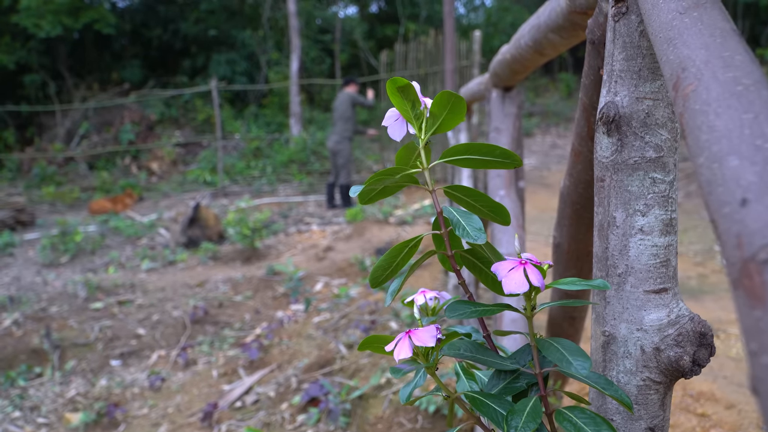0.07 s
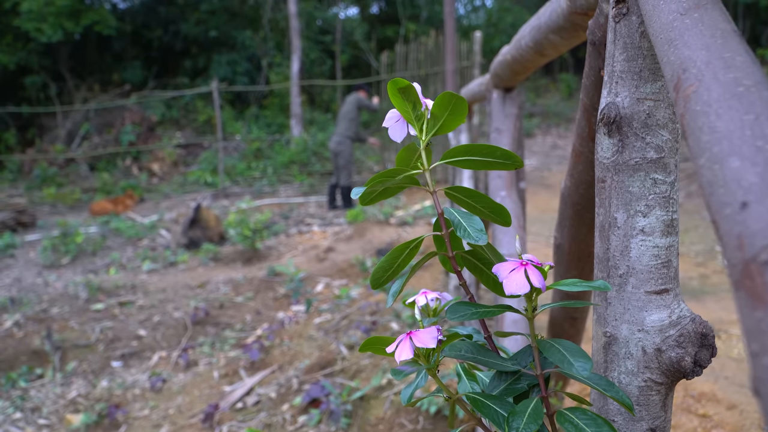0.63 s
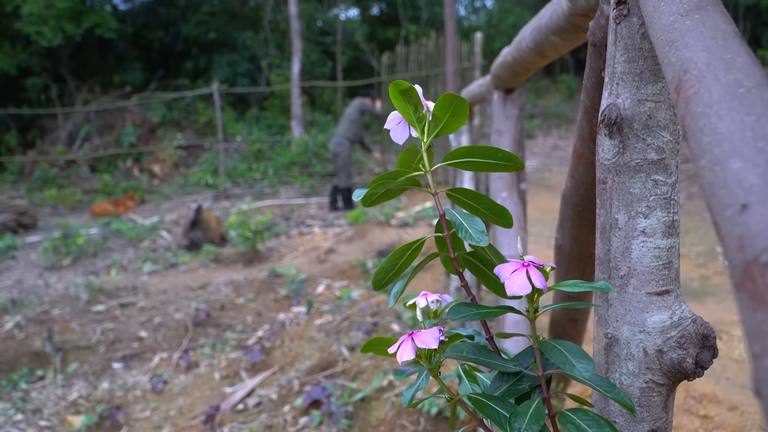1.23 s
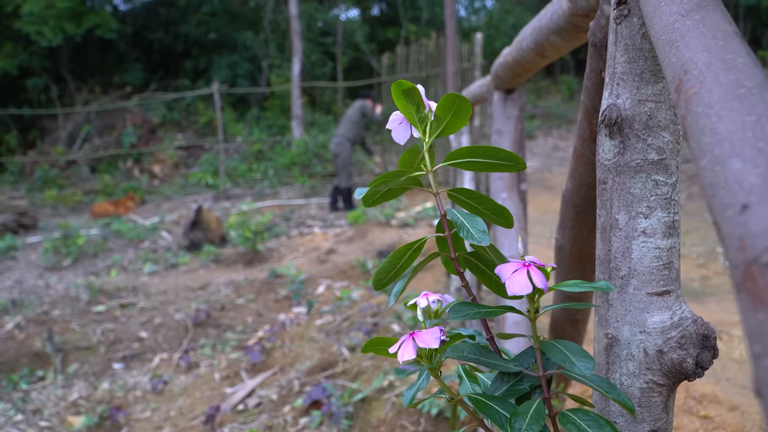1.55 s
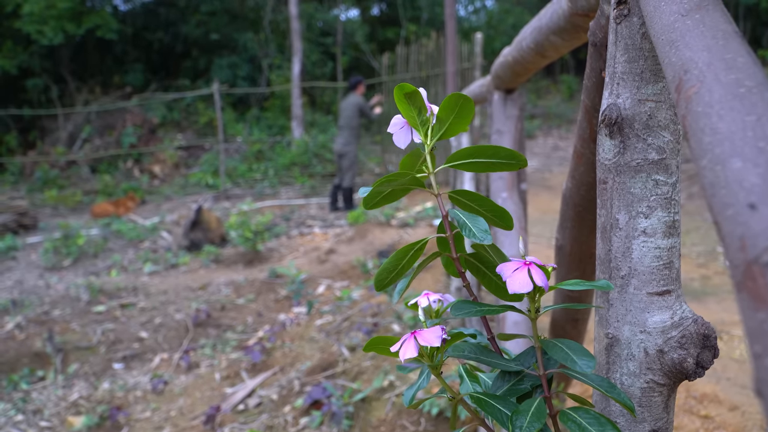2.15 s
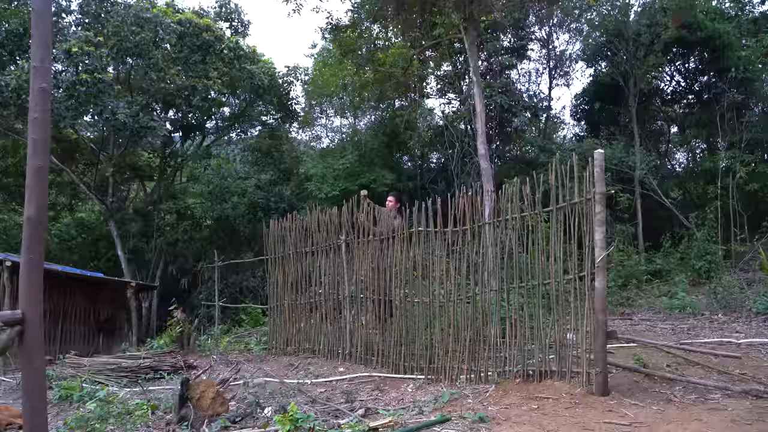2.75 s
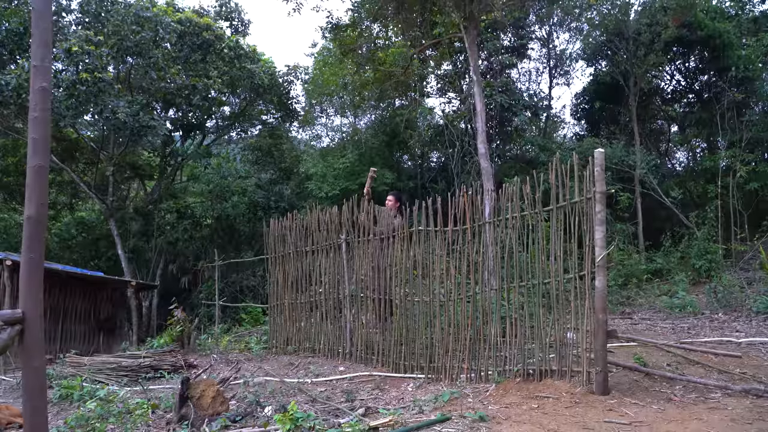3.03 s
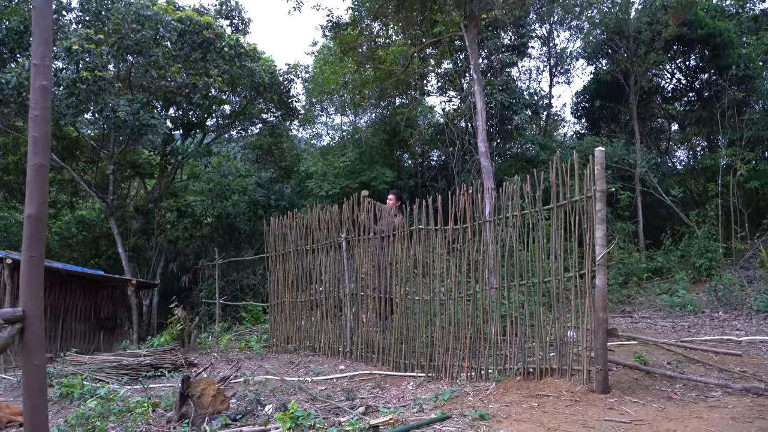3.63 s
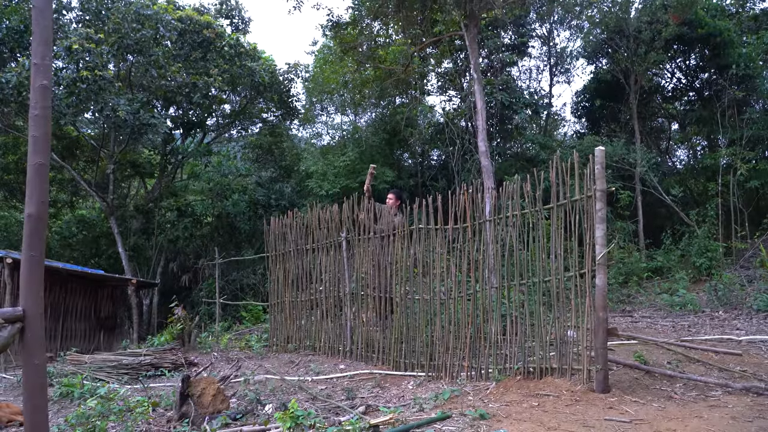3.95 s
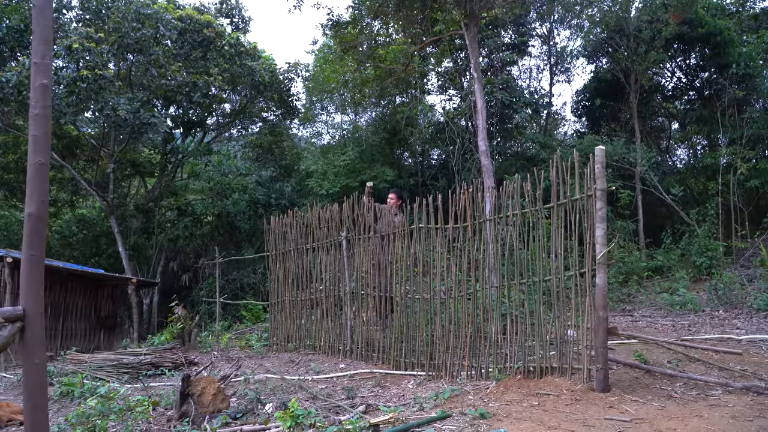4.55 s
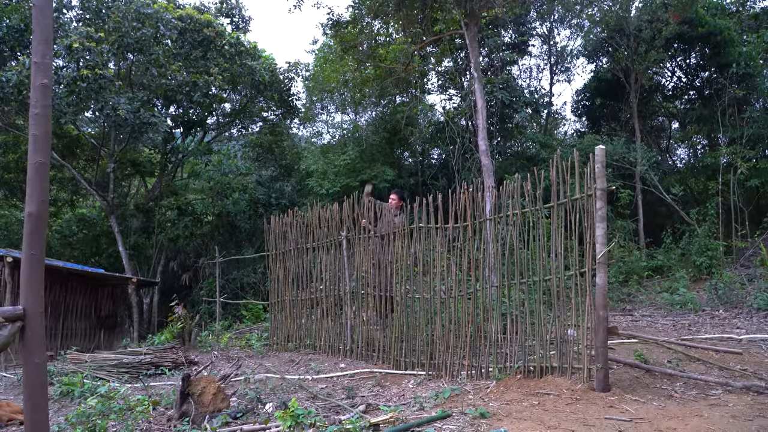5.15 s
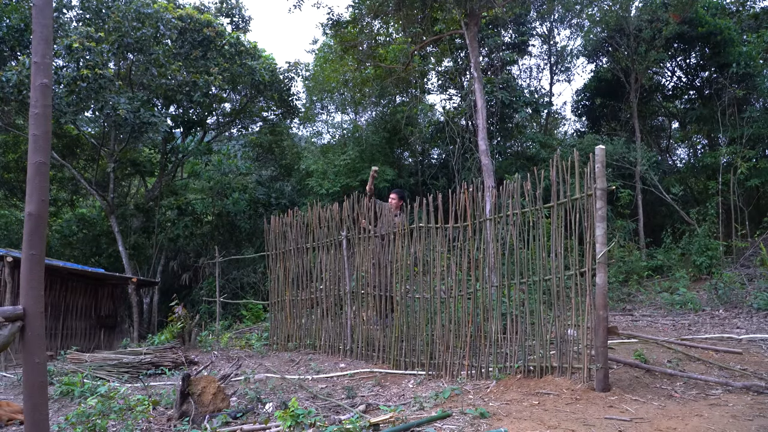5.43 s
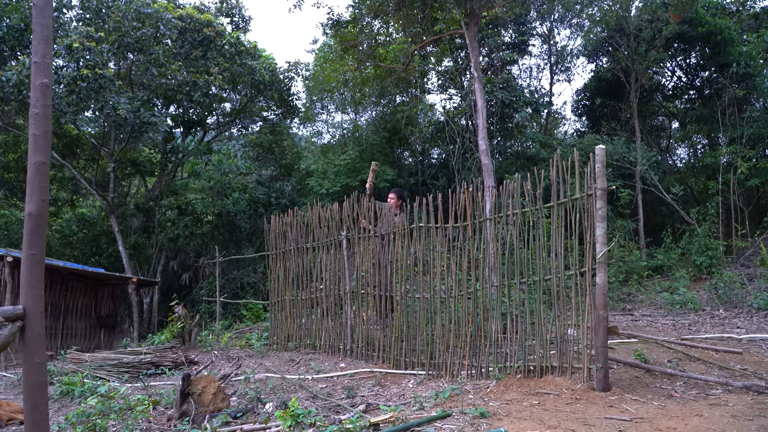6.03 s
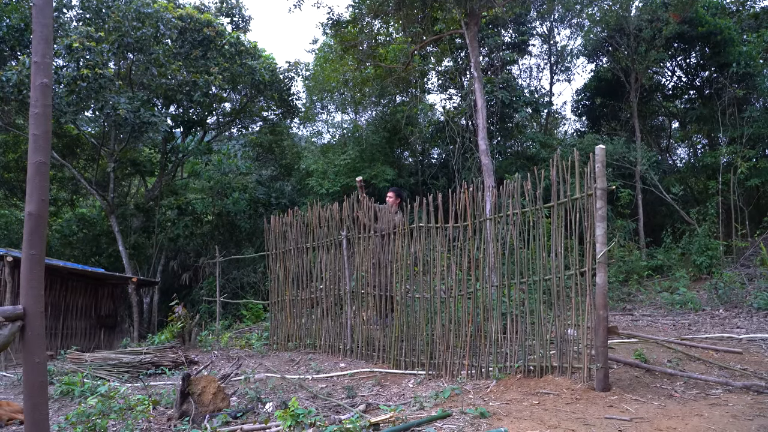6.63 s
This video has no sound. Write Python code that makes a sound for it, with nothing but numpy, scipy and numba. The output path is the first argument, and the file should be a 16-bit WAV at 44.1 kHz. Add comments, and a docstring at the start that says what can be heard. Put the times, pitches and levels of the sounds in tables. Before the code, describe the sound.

At a forest edge, bamboo poles knock and slide in the distance while chicks peep, a hen clucks softly and crickets trill. The microphone then shifts closer to the fence, where a loud cicada buzzes. A club drives a pole into the soil with two sets of three blows, each a hollow thud with a sharp clack of bamboo. The cicada breaks off briefly partway through, and the trees return a short echo.

```python
"""A bamboo fence is being built at a forest edge. At first poles knock and slide far off, while chicks
peep, a hen clucks and crickets trill. Then we listen from beside the fence, under a loud cicada whose
buckling ribs excite its resonant abdomen. A club drives a pole down with six blows; after the second
the cicada breaks off briefly. Each impact thuds into the soil, rings the pole's modes and clacks it
against its neighbours, and the trees scatter the sound back."""
import sys
import numpy as np
from scipy import signal
from scipy.fft import rfft, irfft
from scipy.io import wavfile
from scipy.ndimage import uniform_filter1d
from numba import njit

SR = 44100
rng = np.random.default_rng(int(sys.argv[2]) if len(sys.argv) > 2 else 0)


def store_pcm(level_fs):
    """Save levels as 16-bit WAV."""
    pcm = np.round(np.clip(level_fs, -1, 1) * 32767).astype(np.int16)
    wavfile.write(sys.argv[1], SR, np.atleast_2d(pcm).T)


N = 298998
TIME = np.arange(N) / SR
MOVE_S = 2.815  # the listening point changes from the yard to the fence


def undb(db):
    """Level in decibels to amplitude ratio."""
    return 10 ** (np.asarray(db) / 20)


def unit(x):
    """Normalisation to rms 1."""
    return x / np.sqrt(np.mean(x ** 2))


def colour(x, points, tilt_db=0):
    """Spectral shaping by (f/Hz, level/dB) points, plus a tilt per octave about 3 kHz."""
    octave = np.log2(np.maximum(np.fft.rfftfreq(x.shape[-1], 1 / SR), 1))
    hz, db = np.transpose(points)
    slope = tilt_db * np.clip(octave - np.log2(3000), -3, 3)
    return irfft(rfft(x) * undb(np.interp(octave, np.log2(hz), db) + slope), x.shape[-1])


def add(track, s, x):
    """Superposition of x on the track from time s on."""
    i = max(int(s * SR), 0)
    track[i:i + len(x)] += x[:max(N - i, 0)]


def walk(rate):
    """Smooth random modulation with a spread near 1."""
    k = int(SR / rate)
    return 1.5 * uniform_filter1d(np.repeat(rng.standard_normal(N // k + 1), k), k)[:N]


def ring(modes, t, scatter_db=0, detune=0):
    """Free vibration as a sum of damped modes, with optional scatter in level and frequency."""
    hz, db, t60 = np.transpose(modes)[:, :, None]
    size, shift = rng.standard_normal((2, len(modes), 1))
    sign = (-1) ** np.arange(len(modes))[:, None]
    decay = undb(db + scatter_db * size - 60 * t / t60)
    return np.sum(sign * decay * np.sin(2 * np.pi * hz * (1 + detune * shift) * t), axis=0)


@njit
def resonate(x, hz, width):
    """Second-order resonance with a moving centre and a bandwidth in Hz."""
    y, band, low = np.empty(len(x)), 0., 0.
    for i in range(len(x)):
        g, damping = np.tan(np.pi * min(hz[i], .45 * SR) / SR), width / hz[i]
        v = (band + g * (x[i] + 1e-18 - low)) / (1 + g * (g + damping))
        band, low, y[i] = 2 * v - band, low + 2 * g * v, damping * v
    return y


def stereo(mid, side):
    """Sum and difference: long waves reach two close microphones almost alike."""
    # share of the difference signal: f/Hz, level/dB
    side_share = [(60, -24), (250, -9.5), (600, -2), (12000, 0)]
    return mid + np.array([[1], [-1]]) * colour(side, side_share)


def forest(x, wet_db, side_db, t60):
    """Scattering by ground and trunks: early echoes, then a thin, exponentially decaying tail."""
    t = np.arange(SR // 2) / SR
    grains = rng.standard_normal((2, len(t))) * undb(6.8 * rng.standard_normal((2, len(t))))
    tail = grains * undb(-60 * t / t60) * (1 - np.exp(-t / .0021))
    tail /= np.linalg.norm(tail, axis=1, keepdims=True)
    tail = colour(tail, [(100, 5), (600, -2), (3000, 0), (7000, 0), (14000, 2.5)])
    early = rng.standard_normal(len(t)) * np.exp(-t / .0079)
    echoes = signal.fftconvolve(x, early / np.linalg.norm(early))[:N]
    mid, side = (signal.fftconvolve(x, h)[:N] for h in tail * undb(wet_db))
    return stereo(x + mid, side + undb(side_db) * echoes)


def air():
    """Broadband ambient noise at each spot; far crickets add a narrow noise band over the yard."""
    # noise spectra of the open air: f/Hz, level/dB in a 1 Hz band
    yard_air = [(20, -78), (70, -68.5), (200, -79), (1000, -87), (2600, -87.5), (3700, -82), (4450, -82.5),
                (5100, -90.5), (10500, -95.5), (16000, -102.5)]
    fence_air = [(20, -76), (60, -67), (450, -82.5), (1400, -90.5), (4000, -88.5), (7500, -89),
                 (16000, -99)]
    yard, fence = (colour(rng.standard_normal((2, N)), p) * np.sqrt(SR / 2) for p in (yard_air, fence_air))
    trill_hz = np.full(N, 4510.)
    trill = np.array([unit(resonate(resonate(noise, trill_hz, 160.), trill_hz, 160.))
                      for noise in rng.standard_normal((2, N))])
    yard += trill * undb(-56 + 2 * walk(10))
    return stereo(*np.where(TIME < MOVE_S, yard, fence) * undb(.16 * walk(11)))


def chicks():
    """Frequency glides: each peep is a falling whistle with a weak second harmonic."""
    # nearest chicks: middle t/s, f/Hz, level/dB
    peeps = [(.05, 3680, -42), (.6, 3750, -43.5), (.91, 3400, -42), (1.21, 3640, -41), (1.285, 3460, -38.5),
             (1.52, 3570, -39), (1.81, 3580, -41), (1.86, 3880, -39), (2.115, 3580, -41), (2.19, 4000, -42),
             (2.39, 4300, -41), (2.79, 3580, -41)]
    brood = rng.uniform([0, 3430, -53], [MOVE_S, 4595, -44], size=(60, 3))  # further off; same columns
    out = np.zeros(N)
    for s, hz, db in np.vstack([peeps, brood]):
        length = rng.uniform(.055, .1)
        u = np.linspace(-1, 1, int(length * SR))
        fall = rng.uniform(.13, .3) * u + .014 * walk(400)[:len(u)]
        phase = 2 * np.pi * np.cumsum(hz * (1 - fall)) / SR
        whistle = np.sin(phase) + undb(-19.5) * np.sin(2 * phase)
        add(out, s - length / 2, undb(db) * np.cos(np.pi * u / 2) ** 2 * whistle)
    return forest(out, wet_db=-7, side_db=3, t60=.14)


def hen():
    """Source and filter: irregular puffs of air, shaped by the throat, make short hoarse clucks."""
    # clucks: middle t/s, f/Hz, level/dB
    clucks = [(.171, 327, -38), (.575, 282, -42), (0.762, 314, -37), (1.712, 305, -42), (1.872, 286, -43),
              (2.362, 299.5, -35), (2.537, 343, -33), (3.239, 383, -37), (3.723, 382, -36),
              (6.637, 355.5, -37.5)]
    # throat response: f/Hz, level/dB
    throat = [(150, 3), (330, 2.5), (680, 0), (1100, -11), (6000, -37)]
    out, length_s = np.zeros(N), .041
    u = np.linspace(-1, 1, int(length_s * SR))
    for s, hz, db in clucks:
        cycles = np.cumsum(hz * (1 - .1 * u ** 2 + .064 * walk(296)[:len(u)])) / SR
        puffs = np.diff(np.floor(cycles), prepend=0) + .054 * rng.standard_normal(len(u))
        voice = unit(colour(puffs - puffs.mean(), throat))
        add(out, s - length_s / 2, undb(db) * np.cos(np.pi * u / 2) * voice)
    return forest(out, wet_db=-6.5, side_db=-3, t60=.32)


def cicada_effort():
    """Tension sets resonance: after its pause the cicada starts slack, ringing lower, clicking faster."""
    stop_s, resume_s, swell_s, fade_db_per_s = 4.09, 4.36, .2, 240
    slack = np.exp(-((TIME - resume_s - .15) / .165) ** 2)
    click_hz = 354 * (1 + .007 * walk(3)) + 130.2 * slack
    abdomen_hz = 4273 - 510 * slack
    dying = undb(-31.5 - fade_db_per_s * np.maximum(TIME - stop_s, 0))
    swelling = undb(-30.5) * (1 - np.exp(-(np.maximum(TIME - resume_s, 0) / swell_s) ** 2))
    return click_hz, abdomen_hz, dying + swelling


def cicada():
    """Impulse-driven resonance: tymbal ribs buckle in turn, and each click rings the hollow abdomen."""
    # successive ribs: delay/click period, level/dB
    ribs = [(0, 1.5), (.035, -1), (.012, 0), (.06, -2), (.025, 0)]
    # upper resonances: f/abdomen resonance, bandwidth/Hz, level/dB
    overtones = [(1.93, 800, -26), (2.66, 1910, -25), (3.1, 1900, -25.5), (3.55, 2000, -26.5)]
    click_hz, abdomen_hz, gain = cicada_effort()
    cycles = np.cumsum(click_hz) / SR
    k = np.arange(int(cycles[-1]) - 1)
    delay, rib_db = np.array(ribs)[k % len(ribs)].T
    jitter, shimmer = rng.standard_normal((len(k), 2)).T
    at = np.interp(k + delay + .016 * jitter, cycles, np.arange(N))
    size, clicks, i = undb(rib_db + 2 * shimmer), np.zeros(N), at.astype(int)
    np.add.at(clicks, i, size * (1 - at + i))  # each click is shared between two samples
    np.add.at(clicks, i + 1, size * (at - i))
    song = clicks
    for width in (930., 930., 980.):
        song = unit(resonate(song, abdomen_hz, width))
    for multiple, width, db in overtones:
        rough_clicks = clicks * rng.standard_normal(N)
        song += undb(db) * unit(resonate(rough_clicks, multiple * abdomen_hz, float(width)))
    return forest(song * gain * (TIME > MOVE_S), wet_db=-3, side_db=-17, t60=.18)


def bamboo(contacts, crack_s, rise_s, rattle_db):
    """Impact excitation: a splintery crack rings the tube wall; loose poles chatter on, duller."""
    # crack spectrum: f/Hz, level/dB
    spectrum = [(60, -23), (200, -7.5), (1200, -2.5), (2500, 3), (4500, 0), (8000, -7.5), (16000, -25.5)]
    # wall modes: f/Hz, level/dB, T60/s
    wall_modes = [(757, 0, 0.044), (1171, -5.5, 0.061), (2052, -4.5, 0.14), (2700, -11, 0.16),
                  (3170, -1, 0.059), (3590, 1, 0.075), (4950, 2.5, 0.054)]
    out, t = np.zeros(N), np.arange(SR // 4) / SR
    for s, db, tilt_db in contacts:
        splinters = rng.standard_normal(len(t)) * undb(3.5 * walk(1200)[:len(t)])
        crack = unit(colour(splinters, spectrum, tilt_db)) * np.exp(-t / crack_s)
        rattle = unit(colour(np.flip(splinters), spectrum, tilt_db - 2.6)) * np.exp(-t / .047)
        wall = ring(wall_modes, t, scatter_db=3, detune=.02)
        onset = 1 - np.exp(-t / rise_s)
        add(out, s, undb(db) * onset * (crack + undb(rattle_db) * rattle + undb(-16.5) * wall))
    return out


def handling():
    """Glancing impact and friction: poles knock, bump and slide; twigs snap and leaf litter stirs."""
    # light knocks: t/s, level/dB
    knocks = [(.359, -27.5), (.435, -35), (.625, -36), (1.081, -34.5), (1.698, -36.5), (2.841, -35.5),
              (4.542, -21), (4.603, -23.5), (4.660, -26.5), (4.743, -22.5), (4.858, -21.5)]
    # poles set down: t/s, knock level/dB, bump level/dB
    set_downs = [(1.462, -28, -24), (1.936, -34.5, -30.5), (2.345, -26.5, -27)]
    # modes of a butt bumping the soil: f/Hz, level/dB, T60/s
    butt_modes = [(107, -2.5, 0.1), (153, -6.5, 0.19), (300, 0.5, 0.079)]
    # dry twigs breaking: t/s, level/dB, tilt/(dB per octave)
    snaps = [(.352, -18, 10), (.612, -30.5, -0.5), (1.151, -25.5, 4)]
    # poles sliding over each other and through leaves: middle t/s, length/s, level/dB
    scrapes = [(.32, 0.029, -40), (.43, .12, -37), (.704, 0.046, -40), (1.893, 0.021, -41.5),
               (2.32, 0.032, -44), (4.365, 0.057, -42), (4.57, .11, -42), (5.656, 0.03, -33)]
    # leaf litter underfoot: t/s, level/dB
    litter = [(3.6, -59), (4.6, -40.5), (4.95, -46), (5.95, -41), (6.15, -49.5), (6.78, -43)]
    # friction spectra of poles and litter: f/Hz, level/dB
    scrape_spectrum = [(100, 3.5), (400, -5.5), (1400, 5), (2000, -6), (3500, -14), (15000, -24)]
    litter_spectrum = [(80, -9), (400, 3), (900, -6), (3000, -9), (14000, -33)]
    contacts = [(s, db, -3) for s, db in knocks] + [(s, db, -3.5) for s, db, _ in set_downs]
    out = bamboo(contacts, crack_s=.011, rise_s=.0025, rattle_db=-19)
    out += bamboo(snaps, crack_s=.0024, rise_s=.0001, rattle_db=-19)
    slides, t = list(scrapes), np.arange(SR // 4) / SR
    for s, knock_db, bump_db in set_downs:
        bump = (1 - np.exp(-t / .012)) * ring(butt_modes, t, scatter_db=5.5, detune=.037)
        add(out, s + .0031, undb(bump_db) * bump)
        slides.append((s + .028, .052, knock_db - 11.5))  # the pole slides to rest
    pole_grains, leaf_grains = rng.standard_normal((2, N)) * undb(7 * rng.standard_normal((2, N)))
    sliding = sum(undb(db) * np.exp(-(2 * (TIME - s) / length) ** 2) for s, length, db in slides)
    out += sliding * unit(colour(pole_grains, scrape_spectrum))
    stirring = undb(np.interp(TIME, *np.transpose(litter)))
    out += stirring * unit(colour(leaf_grains * undb(3 * walk(28)), litter_spectrum))
    return forest(out, wet_db=-7, side_db=-6, t60=.45)


def club():
    """Momentum transfer: each blow drives the pole into the soil, rings it and shakes the lashed fence."""
    # blows: t/s, touch level/dB, crack level/dB, crack tilt/(dB per octave), rebound delay/s,
    # rebound level/dB, soil level/dB, body level/dB, body tilt/(dB per octave)
    blows = [(3.289, -18, -14.5, 0, .040, -15.5, -29, -23, 1),
             (3.742, -18.5, -11.5, 1.5, .039, -12, -23, -20.5, 1.5),
             (4.193, -36, -10.5, 4.5, 0.04, -15.5, -21, -21.5, -1),
             (5.269, -33, -9.5, -2.5, .014, -13, -28, -20, 3),
             (5.775, -13, -5, 4.5, .016, -5, -26, -11, 3.5),
             (6.266, -18.5, -12, 1, 0.016, -7.5, -23, -10.5, -1.5)]
    # bending and air modes of the hollow pole: f/Hz, level/dB, T60/s
    body_modes = [(125, -20, 0.16), (174.7, -0.5, 0.11), (257, -19, 0.065), (385, -2.5, 0.1),
                  (469, -2.5, 0.072)]
    # modes of pole and soil together: f/Hz, level/dB, T60/s
    soil_modes = [(64.6, 2, 0.2), (86, -29, 0.45)]
    # dull shudder of the fence: f/Hz, level/dB
    fence_spectrum = [(50, 1), (140, 6), (420, -5), (1200, -11), (4000, -19.5)]
    contacts, thuds, t = [], np.zeros(N), np.arange(SR // 3) / SR
    for s, touch_db, db, tilt_db, rebound_s, rebound_db, *_ in blows:
        contacts += [(s - .006, touch_db, -1.5),  # the club touches
                     (s, db, tilt_db),  # it lands
                     (s + .0045, db - 2, -2.5),  # the pole seats
                     (s + rebound_s / 2, rebound_db - 8.5, -.5),  # rebounding, it brushes one neighbour
                     (s + rebound_s, rebound_db, 2.5)]  # and claps against the next
    out = bamboo(contacts, crack_s=.0045, rise_s=.0005, rattle_db=-17)
    push = 1 - np.exp(-t / .0021)
    for s, *_, soil_db, body_db, body_tilt_db in blows:
        # where the club lands sets the balance of the modes
        modes = [(hz, db + body_tilt_db * np.log2(hz / 260), t60) for hz, db, t60 in body_modes]
        shudder = unit(colour(rng.standard_normal(len(t)), fence_spectrum)) * np.exp(-t / .012)
        body = .6 * ring(modes, t, scatter_db=1.5, detune=.015) + .7 * shudder
        add(out, s, push * undb(body_db) * body)
        add(thuds, s, push * undb(soil_db) * ring(soil_modes, t))
    # the thud is too deep for the trunks to scatter
    return thuds + forest(out, wet_db=-7.5, side_db=-9, t60=.48)


def scene():
    """Superposition of all sources; in the yard the left channel is a little louder and later."""
    left, right = handling() + chicks() + hen() + air()
    in_yard = TIME < MOVE_S
    left = np.where(in_yard, undb(1) * np.roll(left, 2), left)
    right = np.where(in_yard, undb(-1) * right, right)
    return np.array([left, right]) + club() + cicada()


def record(dry):
    """Band limiting: the microphone loses the deepest bass, clips at full scale and cuts the top steeply."""
    low_cut = signal.butter(2, 30, "high", fs=SR, output="sos")
    high_cut = signal.ellip(10, .2, 80, 15800, fs=SR, output="sos")
    return signal.sosfilt(high_cut, np.clip(signal.sosfilt(low_cut, dry), -1, 1))


dry = scene()
out = record(dry)
store_pcm(out)
```